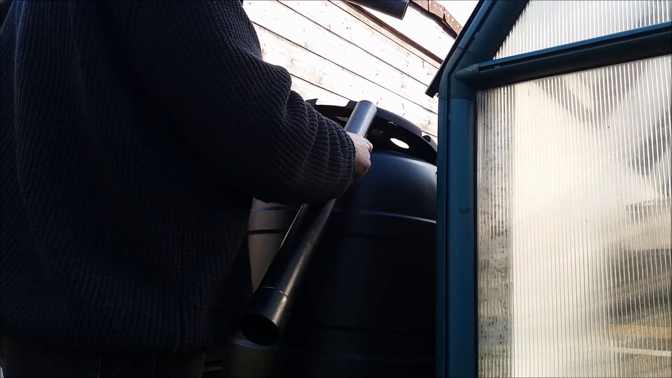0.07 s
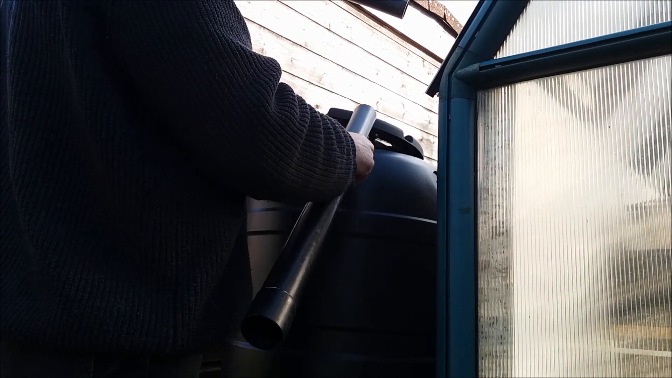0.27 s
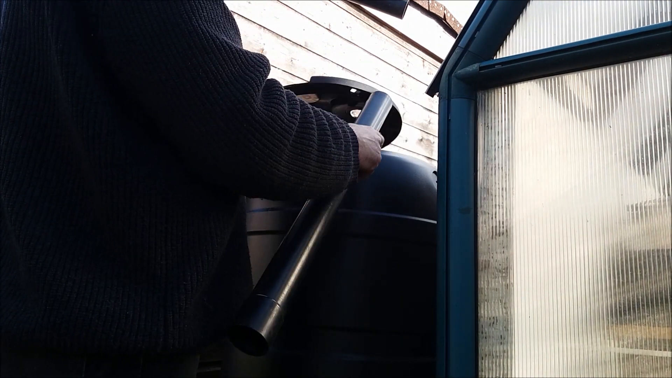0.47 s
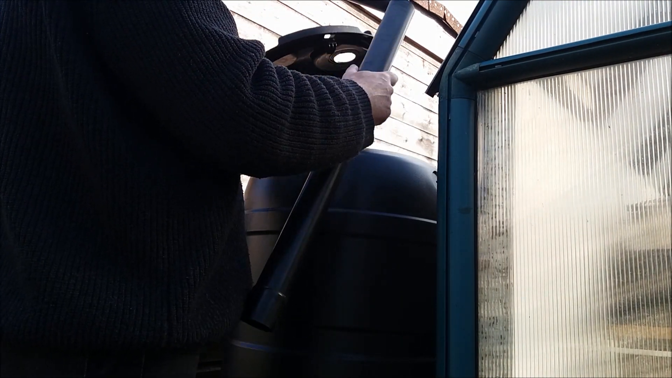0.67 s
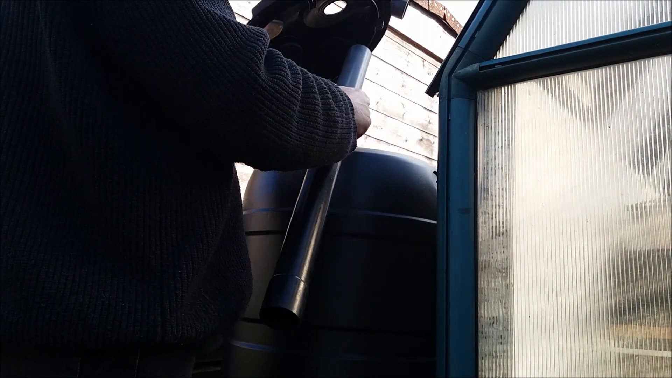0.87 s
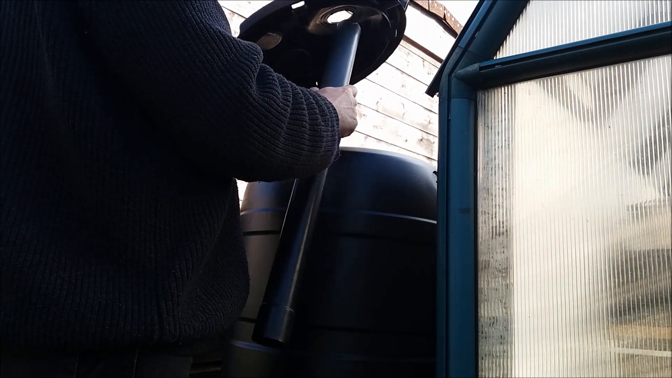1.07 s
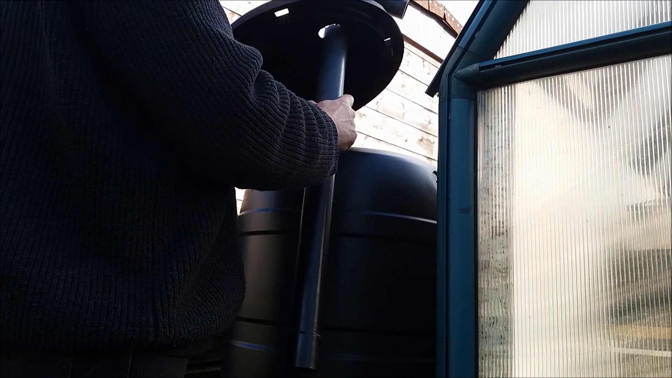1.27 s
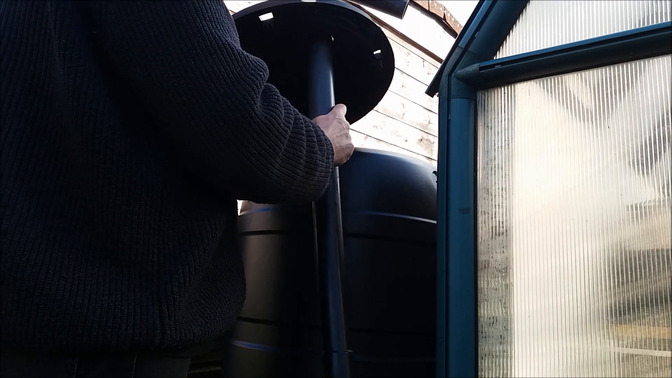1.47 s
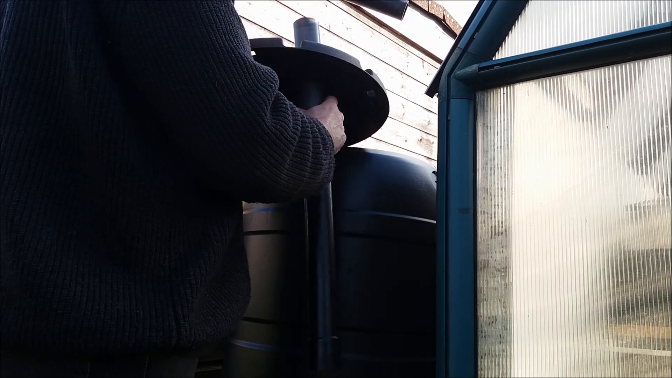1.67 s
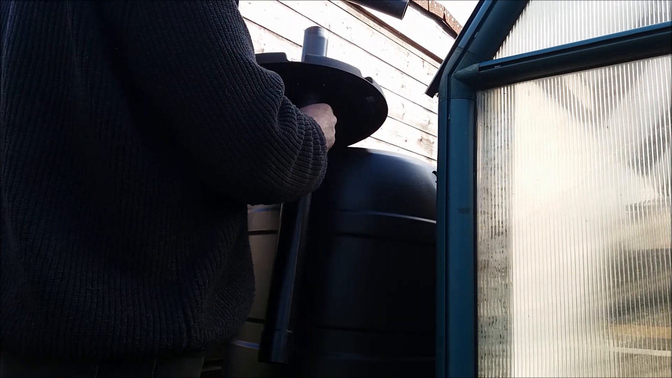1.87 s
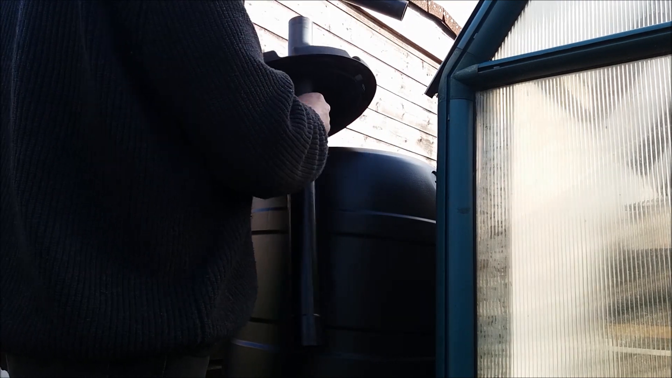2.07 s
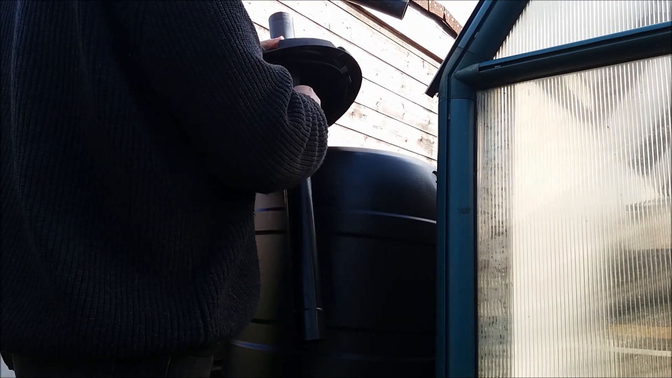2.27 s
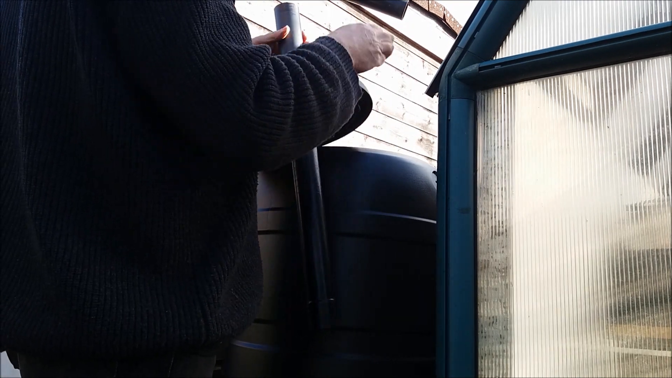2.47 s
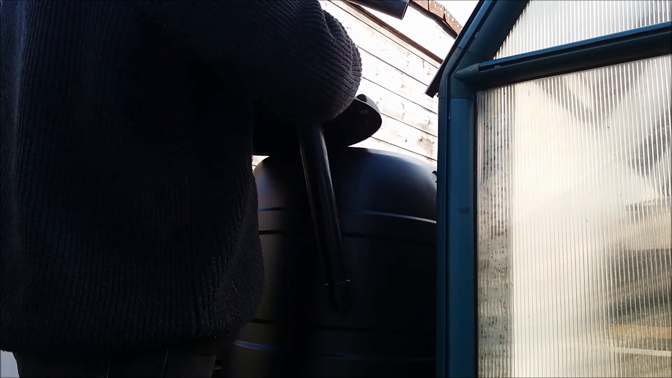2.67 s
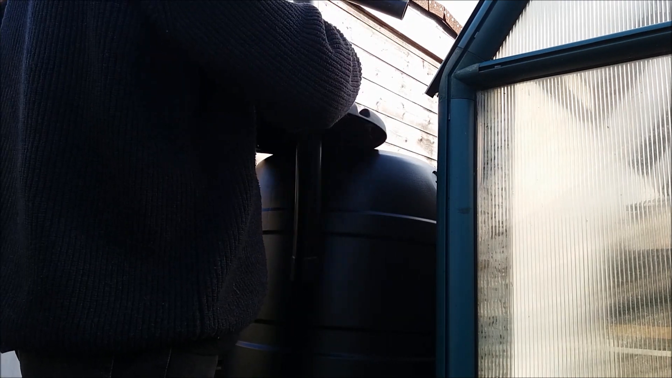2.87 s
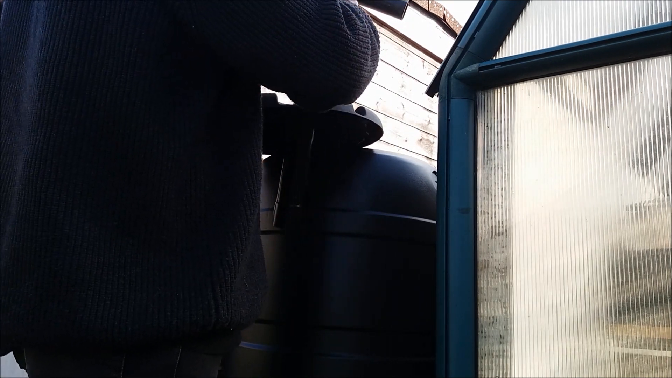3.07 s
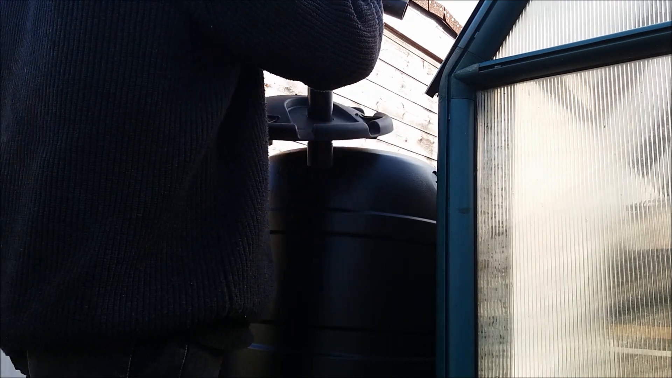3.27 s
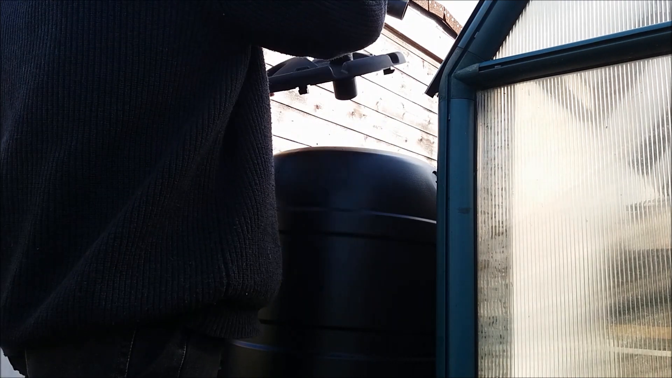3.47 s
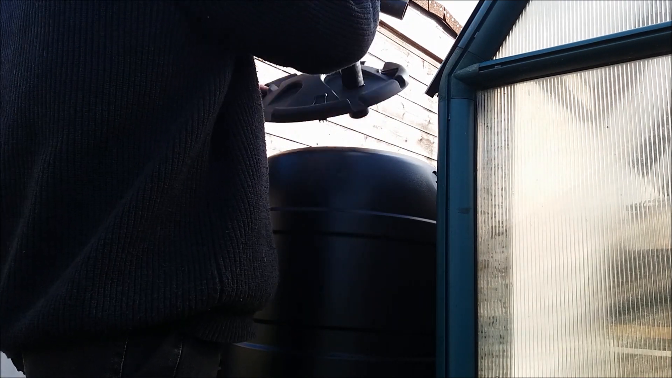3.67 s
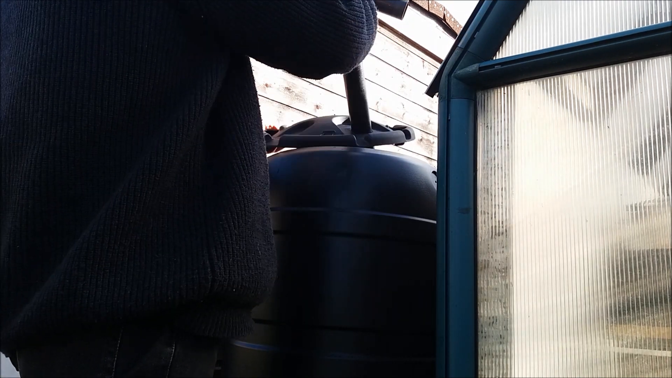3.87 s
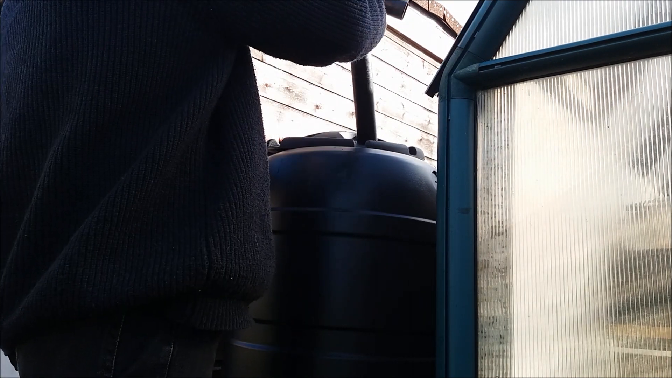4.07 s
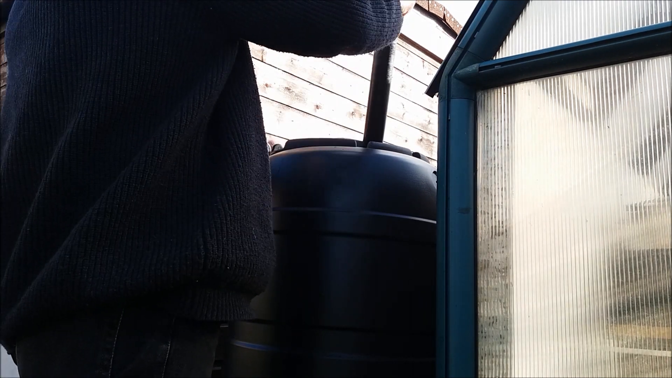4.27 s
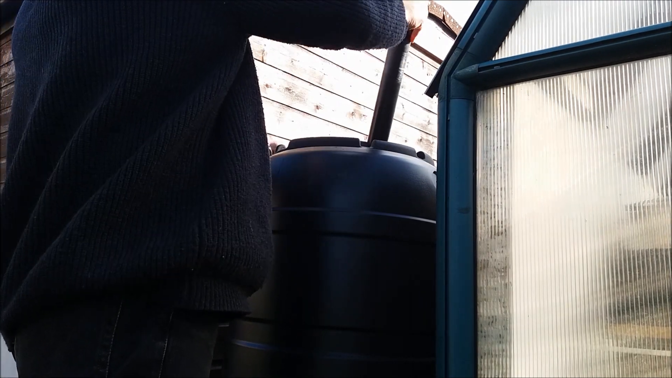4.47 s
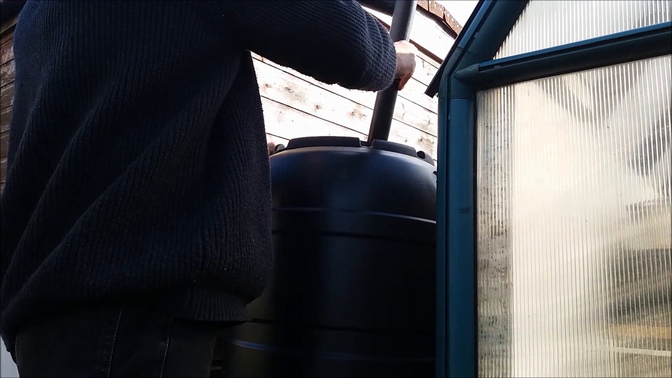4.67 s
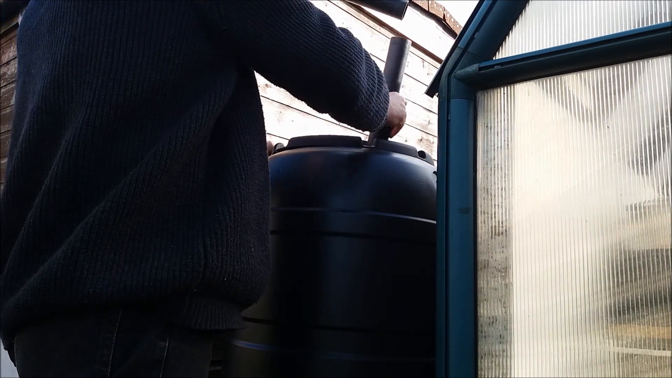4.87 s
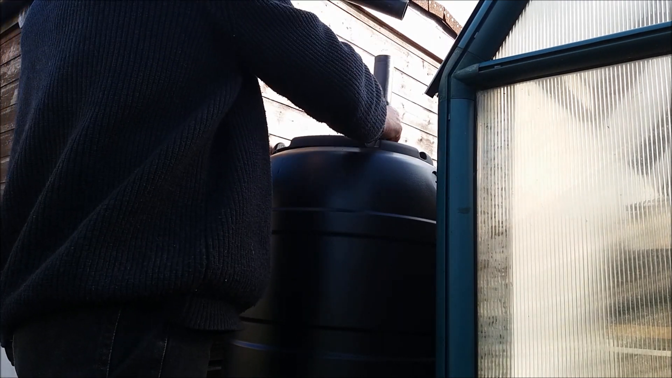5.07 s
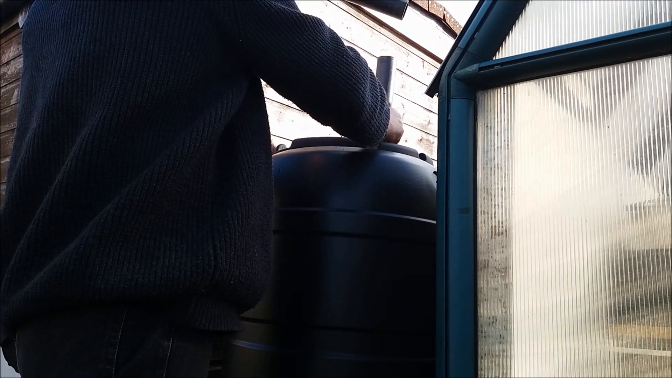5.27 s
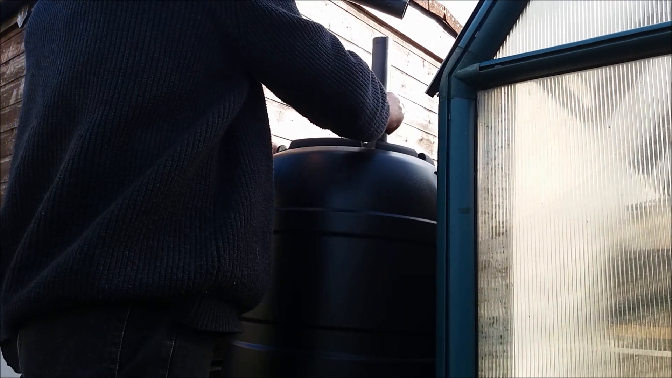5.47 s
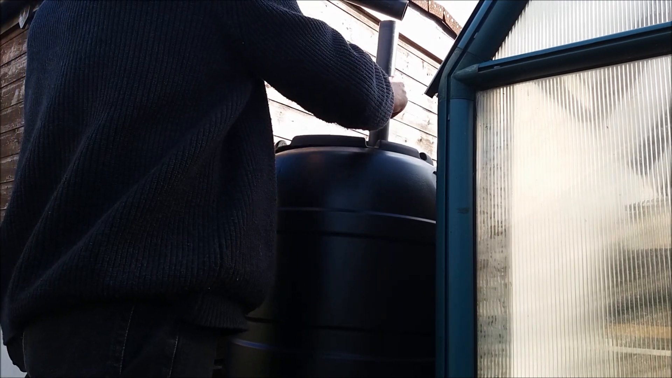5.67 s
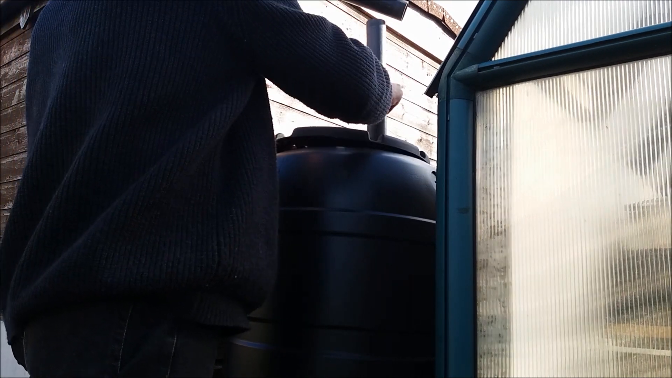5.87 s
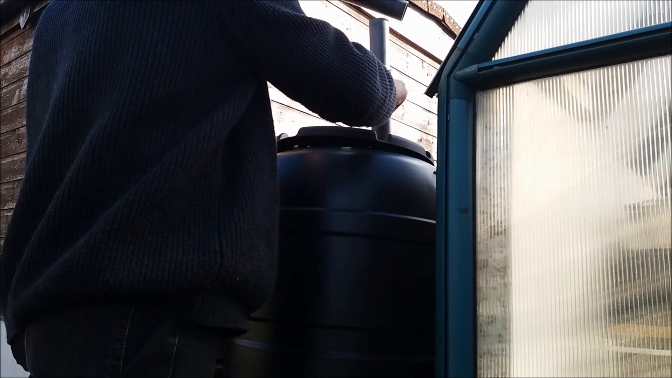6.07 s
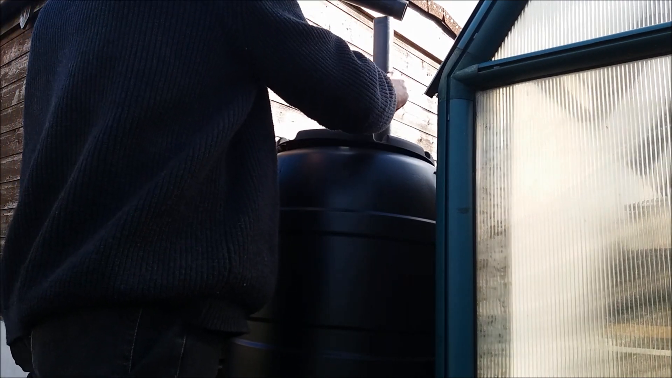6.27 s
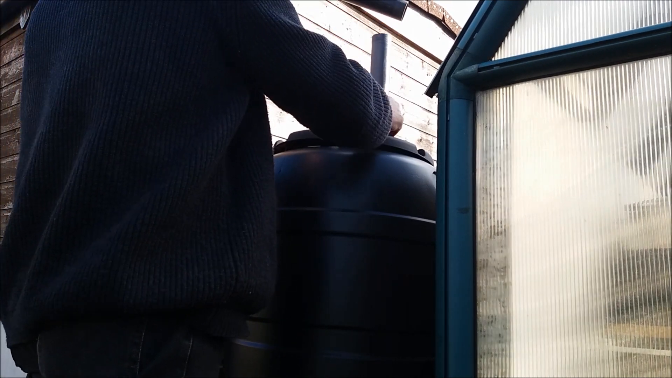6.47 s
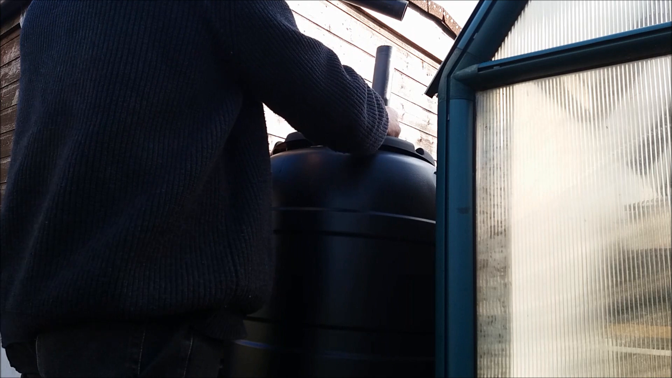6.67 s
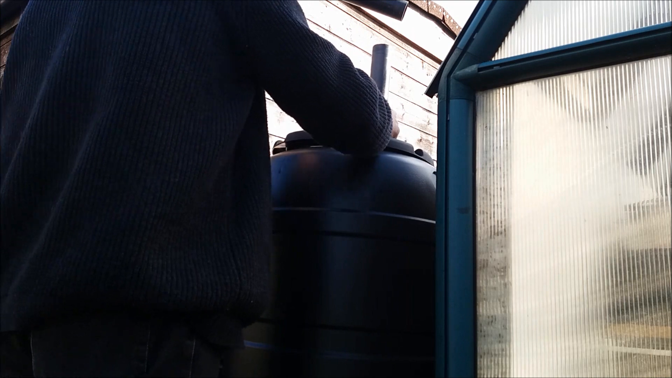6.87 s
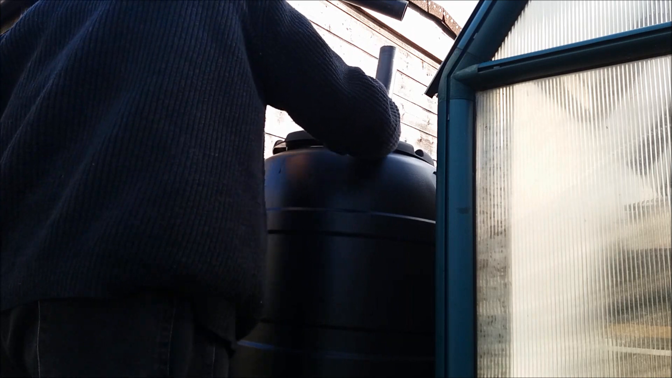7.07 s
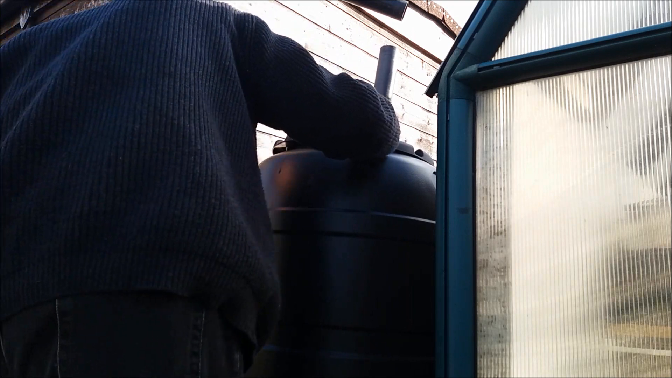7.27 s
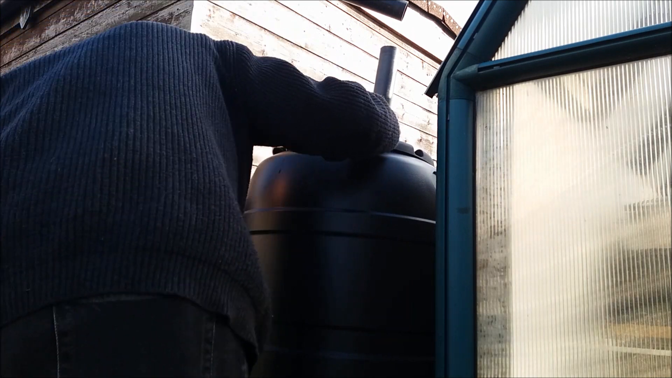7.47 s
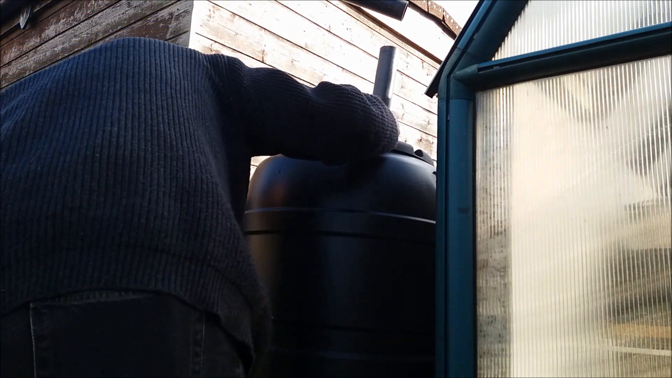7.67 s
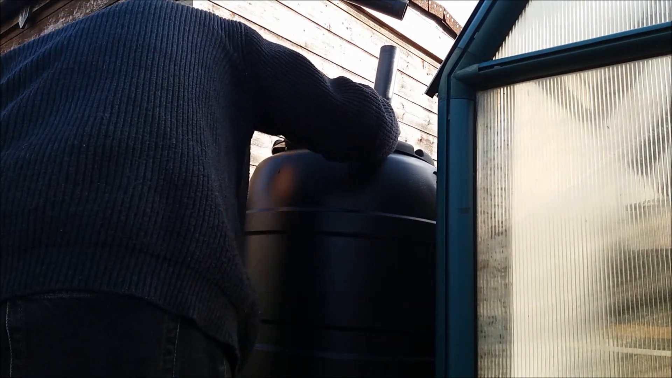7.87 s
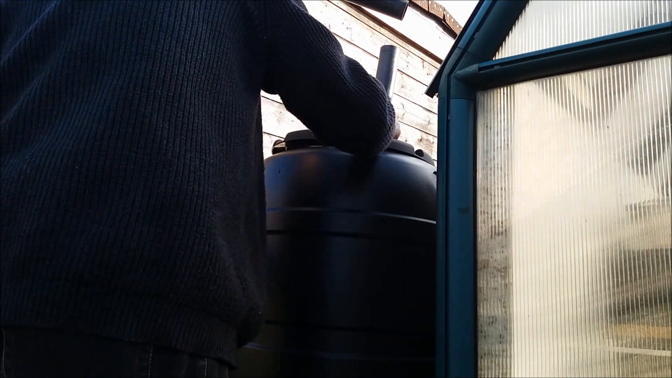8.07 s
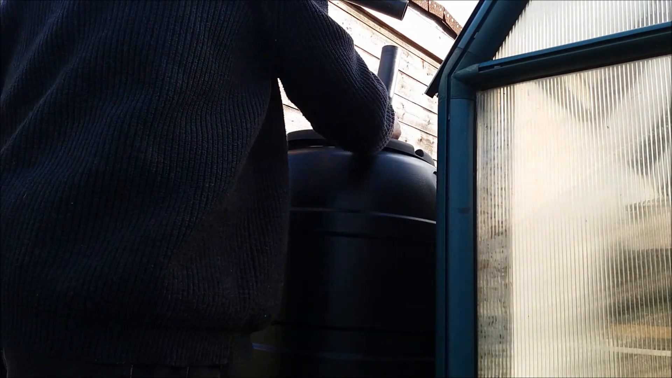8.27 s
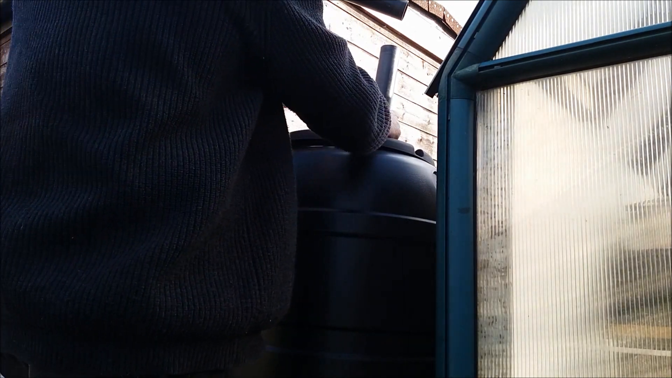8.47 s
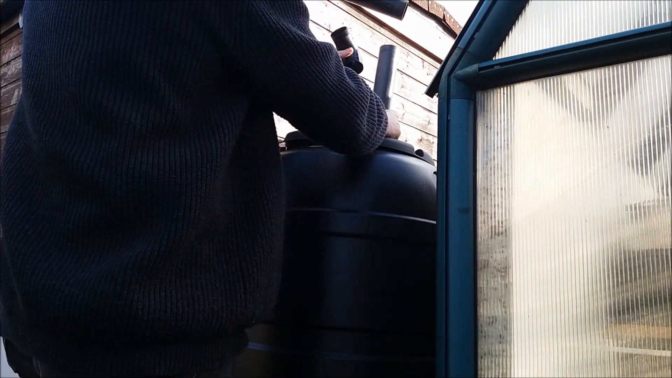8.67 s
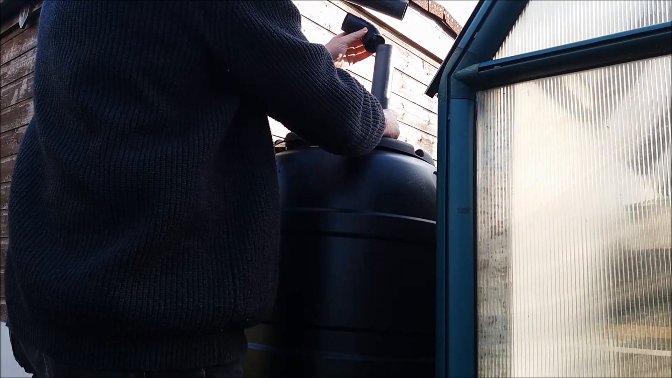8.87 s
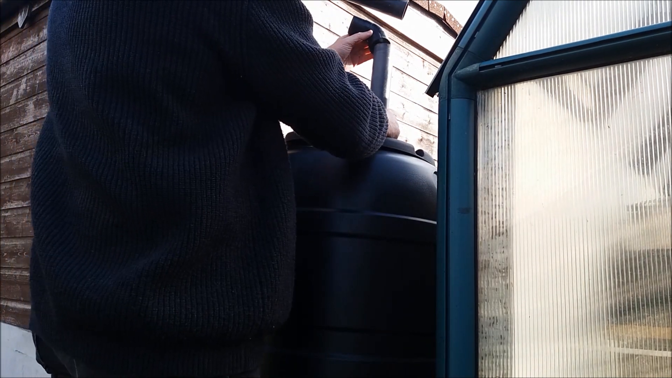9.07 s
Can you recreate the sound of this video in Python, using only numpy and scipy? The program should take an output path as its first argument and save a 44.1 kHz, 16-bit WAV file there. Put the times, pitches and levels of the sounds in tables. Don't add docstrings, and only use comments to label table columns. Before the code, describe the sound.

A close, mostly dry outdoor perspective with slight dull echoes from nearby walls. Far traffic, a low rumble and faint hiss run throughout, the road a little stronger in the first second. At 0.1-0.4 s, faint deep bumps sound inside an empty plastic barrel. From 1.3 s a plastic pipe clicks and knocks, strongest near 1.8 s, then rubs faintly until 2.8 s. At 3.07 s it bangs loudly through the lid, with bounces, a deep boom and ringing bumps to 3.3 s. A dull thump lands at 3.95 s, followed by soft brushing. From 4.5 to 6.3 s come uneven hollow bumps and stuttering scrapes. At 6.35 s a rapid, very loud jammed burst booms and clatters, then muffled bumps and rubbing fade by 7.1 s. A clear small tap with faint bounces comes at 7.75 s. Only distant traffic, rumble and hiss remain to about 9 s.

```python
import sys
import numpy as np
from scipy import signal
from scipy.io import wavfile

SR = 44100
rng = np.random.default_rng(int(sys.argv[2]) if len(sys.argv) > 2 else 0)


def dump(signal):
    limited = np.clip(np.atleast_2d(signal).T, -1, 1)
    pcm = np.round(limited * 32767).astype(np.int16)
    wavfile.write(sys.argv[1], SR, pcm)


def boost_factor(decibels):
    exponent = np.asarray(decibels, float) / 20
    return 10 ** exponent


N = 402191
T = np.arange(N) / SR

# start_s, peak_db, boom_db, hardness_db, ring_time (1 = full)
PIPE_KNOCKS = [(1.2995, -32, -45, -6, 0.4), (1.3065, -25.5, -30, -11, 0.23), (1.652, -30, -38, -6, 0.14),
               (1.7125, -41, -34, -4, 0.65), (1.8052, -16, -21, -16, 0.51),
               (1.8955, -25.5, -10, -16.5, 0.59), (2.004, -44, -4, -8, 0.45), (2.68, -39.5, -21, -4.5, 0.3),
               (2.692, -28, -11, -9.5, 0.15), (2.721, -36.5, -21.5, -2.5, 0.24),
               (2.836, -29.5, -9, -7.5, 0.08)]
LID_KNOCKS = [
    (3.026, -32, -12.5, -9, 0.062),
    (3.0683, -6, -7.5, -10.5, 0.66),
    (3.1155, -17.5, -18, -8.5, 0.55),
    (3.209, -24, 5, -23, 0.18),
    (3.274, -18.5, -14, -16.5, 0.18),
    (3.3095, -15, -8.5, -8, 0.73),
    (3.466, -33, -15, -7.5, 0.34),
    (3.615, -44, -22, -3.5, 0.45),
]
SEAT_KNOCKS = [
    (3.9545, -22, -3.5, -6, 1),
]
INNER_KNOCKS = [(.142, -40, -28, -9, 0.74), (.268, -34, -11, -11, 0.7), (.3, -32, 6, -10.5, .4),
                (.383, -38.5, -8, -14, 0.9), (4.485, -23.5, -29, -9, 0.52), (4.498, -28.5, -19, -5.5, 0.69),
                (4.603, -31, -25, -9.5, 1), (4.639, -24.5, -14.5, -17, 0.51), (4.837, -33, -24, -7.5, 1),
                (4.916, -26.5, -38, -11.5, 0.66), (5.049, -33, -19, -5.5, 0.81),
                (5.267, -21.5, -31, -22.5, 1), (5.599, -37, -21, -3.5, 1), (5.76, -35, -20, -6, 0.77),
                (5.953, -27.5, -17.5, -8.5, 0.26), (6.187, -21, -17, -16.5, 0.36),
                (6.259, -26, -18.5, -24, 0.56), (6.494, -24.5, -19, -35, 0.51), (6.555, -30.5, -24, -8, 1),
                (6.636, -15.5, -12, -41, 0.32), (6.786, -30, -22, -12, 0.76),
                (6.879, -26, -20.5, -14, 0.83), (6.922, -26, -26.5, -6.5, 0.74)]
JAM_KNOCKS = [
    (6.341, -21.5, -5, -9, 0.45),
    (6.348, -12.5, -7, -18, 0.81),
    (6.356, -11.5, -14, -13.5, 1),
    (6.365, -3, -11, -18.5, 0.28),
    (6.3715, -8, 2.5, -14.5, 0.62),
    (6.385, -16.5, 0, -7.5, 0.81),
    (6.419, -23.5, -11, -3, 0.83),
]
FITTING_KNOCKS = [
    (7.7465, -23.5, -11, -10, 0.89),
    (7.774, -38.5, -9, -7.5, 0.92),
    (7.819, -34, 1, -16, 0.82),
]

# pitch_hz, level_db, t60_s (time to fall 60 dB)
PIPE_MODES = [(102, 7, 1), (154.5, 16, 0.092), (201, 2.5, 0.17), (280, 3.5, 0.48), (570, 3, 0.057),
              (720, -3, 0.2), (774, 10.5, 0.053), (1328, 7, 0.12), (1880, 17, 0.026), (2320, -25, 0.1)]
LID_MODES = [(87.4, 5, 1), (101, 6, 0.5), (142, 7, 0.17), (267, -2, 0.37), (317.8, -2.5, 0.47),
             (587, 12, 0.034), (740, 6, 0.075), (964, -42, .1), (1610, 4, 0.073), (1700, 3.5, 0.051),
             (1840, -8.5, 0.2), (2200, -17.5, 0.13), (2370, 7, 0.049)]
SEAT_MODES = [(72.6, 9, 0.11), (84.2, -2, 0.68), (89.5, 0, 0.18), (101.3, -5.5, 0.66), (180, 5.5, 0.053),
              (251, 6.5, 0.042), (296, -10.5, 0.29), (429, -3, 0.044), (770, -1.5, 0.07),
              (938, -13.5, 0.24), (1350, -15, 0.08)]
INNER_MODES = [(55.6, -5, 0.96), (99, 31, 0.075), (168.3, -0.5, 0.18), (277, 8, 0.046), (320, 3.5, 0.062),
               (381, 5.5, 0.041), (487.6, -1.5, 0.094), (716, -6, 0.24), (946, -9, 0.11),
               (1217, -4.5, 0.12), (2210, -5.5, 0.04)]
JAM_MODES = [(59, 5, 0.16), (101, 1, 0.12), (182.3, 0.5, 0.28), (278, 1, 0.17), (324, 2, 0.14),
             (560, 5.5, 0.046), (2250, -16, 0.036)]
FITTING_MODES = [(111, -2, 0.23), (164, 6.5, 0.16), (267, -8, 0.33), (463, 5, 0.04), (810, 6, 0.02),
                 (1394, 1.5, 0.11), (1867, 3.5, 0.07), (2190, -5, 0.059)]

# pitch_hz, level_db (per Hz)
RATTLE = [(150, -3.5), (400, 8), (900, 1.5), (2000, -1.5), (3500, -6.5), (5500, -19.5), (11000, -25.5),
          (15000, -26.5)]
# pitch_hz, t60_s
RATTLE_T60 = [(150, 0.46), (500, 0.12), (1500, 0.22), (4000, 0.21), (10000, 0.09)]
# low_hz, high_hz, level_db
CRACK = [(1000, 2990, 0.5), (3050, 4180, -6.5)]
# start_s, pitch_hz, peak_db, t60_s
TOUCHES = [(1.301, 2700, -39.5, 0.02), (1.308, 4800, -46, 0.028), (1.307, 1350, -31.5, 0.023),
           (1.308, 925, -30, 0.021), (1.716, 690, -26, 0.046), (1.716, 2300, -39, .04),
           (1.787, 3910, -42.5, .03), (2.001, 2005, -46, 0.067), (2.785, 810, -42, 0.055),
           (2.382, 2200, -51.5, 0.12), (2.403, 3600, -58, 0.04), (2.523, 3950, -61, 0.065),
           (2.721, 1770, -37, 0.047), (2.722, 4250, -41.5, .03), (2.839, 2770, -46, .04),
           (3.024, 309, -32, 0.17), (3.025, 740, -38, 0.1), (3.028, 2410, -35, 0.027),
           (3.208, 1420, -34, 0.035), (3.209, 508, -29, 0.046), (3.276, 1170, -27, 0.03),
           (3.468, 2350, -36, 0.031), (3.616, 2280, -44, 0.037), (4.499, 639, -32.5, .15),
           (4.5, 2810, -40, 0.036), (4.623, 1050, -29, 0.022), (4.839, 1800, -39, 0.048),
           (1.898, 1800, -31, 0.013), (3.977, 798, -25, 0.096), (4.988, 2350, -53, .12),
           (5.288, 666, -46, 0.054), (5.565, 2500, -52, 0.044), (5.606, 1240, -38, .04),
           (5.643, 2420, -46, 0.084), (5.756, 2970, -46, .04), (5.955, 3780, -56, 0.027),
           (6.364, 1220, -30, 0.036), (6.375, 3320, -24, 0.024), (6.422, 1270, -36, 0.2),
           (6.42, 1800, -27.5, 0.036), (6.425, 607, -29, 0.13), (6.498, 476, -23, 0.042),
           (6.622, 295, -28.5, 0.2), (6.88, 784, -38.5, 0.11), (6.924, 770, -35.5, 0.064),
           (6.922, 1194, -49, .08), (7.744, 440, -34, 0.023), (7.748, 780, -33, 0.02),
           (7.76, 486, -43, 0.068), (7.772, 1500, -47, 0.045)]
# start_s, level_db, treble_db
SNAPS = [(1.3085, -9, -5), (1.656, -20, 8), (1.787, -21, 15), (1.8083, -12, -4), (1.836, -15, 3),
         (1.896, -22, 5), (1.92, -27, 14), (2.405, -28, 9), (3.0698, 0.5, -18), (3.131, -6, -8),
         (3.2092, -23, -8), (3.276, -17, -6), (3.195, -21, 4), (3.226, -23, -4), (4.8412, -30, 15),
         (4.893, -33, 8), (4.918, -11, 13), (5.014, -27, 0), (5.0517, -22, 10), (5.268, -42, 2),
         (6.375, -5.5, 10), (6.432, -19, -6), (6.46, -24, -4), (4.503, -22, -4), (4.625, -27, 0),
         (6.9224, -24, -2), (7.748, -13.5, 8), (7.7665, -35, 22)]
# delay_s, level_db
ECHOES = [(.0043, -23), (.0091, -16.5), (.0157, -21), (.027, -16.5), (.043, -16)]

# start_s, length_s, level_db, boom_share_db, clatter_share_db
DRAGS = [(.13, 0.12, -49.5, 11.5, -13), (.265, 0.16, -39, 1, -16), (1.645, 0.096, -46.5, -14, 4),
         (1.85, 0.22, -45, -3.5, -3), (2.2, 0.11, -47.5, -4, -0.5), (2.32, 0.17, -53, 2, 5.5),
         (2.41, 0.018, -48, 15, 10), (2.52, 0.19, -54, -4, -0.5), (2.68, 0.56, -52.5, -1.5, 0.5),
         (3.02, 0.024, -32, -7, -9), (3.12, 0.16, -36, -8, -1), (3.36, 0.1, -50, 8, 1),
         (3.48, 0.24, -64, 12, 10), (4.44, 0.07, -48.5, -1, 3.5), (4.485, 0.22, -38.5, -4, -3.5),
         (4.92, 0.39, -45.5, -2, -6), (5.19, 0.18, -43.5, 1.5, -1.5), (5.4, 0.15, -41, -6.5, -3.5),
         (5.63, 0.25, -43.5, -0.5, 0), (5.935, 0.15, -46, 1, -1), (6.19, 0.41, -47.5, 6, -8),
         (6.42, 0.26, -38, -4, -5.5), (6.58, 0.096, -34.5, 1, -5), (6.68, 0.11, -36.5, 2.5, -6),
         (6.88, 0.06, -42.5, -4, 3), (7.05, 0.05, -52.5, 11, 4.5)]
# start_s, length_s, level_db, scratch_share_db, upper_wall_share_db
SCUFFS = [(.06, 0.38, -66.5, -30, 3), (4.595, 0.032, -44, -36, -12), (1.62, 0.026, -40.5, -20, 3),
          (1.675, .035, -44, -12, 0), (1.7, 0.039, -46, -9, 8.5), (1.783, 0.024, -37.5, -10.5, 6),
          (1.86, 0.26, -59.5, -9.5, 3), (2.28, 0.15, -61, -28, -28), (2.47, 0.84, -62.5, -14, 5),
          (2.68, 0.044, -48, -16, 8.5), (2.82, 0.0082, -37, -17, 6.5), (3.022, 0.014, -40.5, -10, 16.5),
          (3.13, 0.098, -45, -18.5, 0.5), (3.36, 0.098, -52, -13, 4.5), (3.428, 0.024, -40, -15, 8.5),
          (3.57, 0.061, -53.5, -14, 8.5), (3.99, 0.27, -63, -30, -2), (4.485, 0.065, -48, -37, -1),
          (4.56, 0.34, -57.5, -30, -0.5), (4.85, 0.08, -50, -14, 3.5), (4.92, 0.11, -59, -9, 10.5),
          (1.33, 0.04, -59, -20, 2), (5.57, 0.18, -52.5, -28, -3), (5.74, 0.17, -60.5, -17, -1),
          (5.95, 0.068, -61, -39, 2), (6.2, 0.58, -59, -30, -9), (6.42, 0.12, -45.5, -31, -8),
          (6.54, 0.11, -46, -22, -6), (6.7, 0.13, -51.5, -26, -2.5), (6.92, 0.1, -57.5, -17, 1),
          (7.0, 0.16, -67.5, -22, 0), (1.49, 0.024, -71, -23, 10), (2.95, .06, -58, -15, 4),
          (3.26, 0.017, -51, -8, 10), (5.045, 0.049, -54, -17, 5), (1.9, 0.025, -63, -5, -2)]
# pitch_hz, width_hz, level_db
BOOM = [(68, 27, 9.5), (80.8, 14, 3.5), (105, 58, -10)]
HOLLOW = [(183, 9.2, -0.5), (278.4, 29.4, 4), (326.3, 8.2, 6), (381, 25, -4), (525, 45, -3.5),
          (591, 50, -6), (773, 54, -4)]
WALL = [(1006, 490, -5), (1440, 270, -4.5), (1473, 76, -8), (1800, 320, -5), (2133, 630, -4.5),
        (2830, 2650, -8.5), (4750, 2500, -8)]
SCRATCH = [(4800, 3700, -1.5), (7960, 2100, 3), (11000, 7000, -8)]
# start_s, end_s, start_hz, end_hz, level_db
SINGING = [(1.652, 1.72, 288, 280, -49.5), (1.738, 1.805, 280, 282, -44.5), (2.78, 2.815, 810, 800, -63),
           (2.828, 2.862, 840, 770, -53.5), (4.542, 4.578, 280, 296, -46), (0.35, 0.455, 320, 280, -54),
           (4.93, 4.97, 280, 267, -50.5), (6.885, 6.925, 380, 370, -48), (7.775, 7.85, 181, 136.5, -51),
           (7.85, 7.93, 137, 128, -67), (3.215, 3.27, 151, 141, -51)]
# start_s, end_s, start_hz, end_hz, level_db
BRUSHES = [
    (.58, .9, 4550, 4300, -90),
    (4.02, 4.22, 1350, 1157, -60.5),
    (4.1, 4.3, 4250, 4450, -81),
    (4.22, 4.5, 4500, 4000, -74.5),
    (4.52, 4.8, 4300, 4600, -78),
    (5.58, 5.76, 2450, 2490, -73),
    (5.78, 5.93, 3250, 3250, -62),
    (5.96, 6.08, 3250, 3150, -66),
    (6.72, 6.83, 2700, 2295, -64),
]

# time_s, level_db
TRAFFIC = [
    (0.0, -52.5),
    (0.46, -52),
    (2.23, -59),
    (3.2, -56.5),
    (3.8, -59),
    (6.5, -57),
    (7.19, -61),
    (8.48, -62.5),
    (9.12, -57.5),
]
# pitch_hz, level_db (per Hz)
ROAD = [(120, -53.5), (200, -16.5), (316, -15.5), (640, -6.5), (892, -2.5), (1870, -14.5), (2420, -34),
        (6500, -68)]
# pitch_hz, width_hz, level_db
TYRES = [(486, 48, 0.5), (856, 130, 2), (1222, 184, -1)]
# time_s, level_db
PASSING = [
    (0, -9),
    (.3, 2),
    (.65, 2.5),
    (1.25, 0),
    (1.45, -5),
    (8.4, -3.5),
    (9.12, -3),
]
# pitch_hz, level_db (per Hz)
RUMBLE = [(15, -54.5), (32, 1.5), (81, -1.5), (219, -7.5), (299, -12.5), (400, -13.5), (520, -17.5),
          (880, -120)]
# pitch_hz, level_db (per Hz)
HISS = [(1470, -22), (2500, 13), (3900, 9.5), (4340, 5), (6970, 6), (8940, 10.5), (15200, 8.5), (16000, 11)]
# time_s, level_db
HISS_SWELL = [
    (0.0, -69),
    (2.64, -70),
    (3.4, -64.5),
    (3.68, -69.5),
    (6.81, -66.5),
    (7.26, -70),
    (9.12, -72),
]

EDGES = 22 * 2 ** np.arange(0, 9.7, 1 / 3)
RATTLE_HZ = np.sqrt(EDGES[9:-2] * EDGES[10:-1])
RATTLE_BANDS = [signal.butter(3, edges, "band", fs=SR, output="sos") for edges in zip(EDGES[9:-2], EDGES[10:-1])]


def rms_one(x):
    return x / np.sqrt(np.mean(x ** 2) + 1e-20)


def in_time(rows):
    s, db = np.transpose(rows)
    return np.interp(T, s, db)


def at_hz(points, hz):
    points_hz, db = np.transpose(points)
    return np.interp(np.log(hz), np.log(points_hz), db)


def low(x, hz):
    return signal.sosfilt(signal.butter(7, hz, fs=SR, output="sos"), x)


def band(x, low_hz, high_hz, order=2):
    return signal.sosfilt(signal.butter(order, [low_hz, high_hz], "band", fs=SR, output="sos"), x)


def drift(rate_hz, depth_db):
    r = np.exp(-80 * np.pi * rate_hz / SR)
    slow = signal.lfilter([1], [1, -2 * r, r * r], rng.standard_normal(N // 40 + 2002))
    slow = slow[2000:]
    return np.interp(np.arange(N) / 40, np.arange(len(slow)), boost_factor(depth_db * rms_one(slow)))


def resonate(x, peaks):
    out = 0
    for k, (hz, width_hz, db) in enumerate(peaks):
        r = np.exp(-np.pi * width_hz / SR)
        b = np.array([1, 0, -1]) * (1 - r * r) / 2
        a = [1, -2 * r * np.cos(2 * np.pi * hz / SR), r * r]
        out = out + (-1) ** k * boost_factor(db) * signal.lfilter(b, a, x)
    return rms_one(out)


def coloured(spectrum, patchy_db):
    white = rng.standard_normal((2, N))
    out = 0
    for k, (low_hz, high_hz) in enumerate(zip(EDGES, EDGES[1:])):
        hz = np.sqrt(low_hz * high_hz)
        if spectrum[0][0] / 1.3 < hz < spectrum[-1][0] * 1.3:
            flicker = drift(2.7, patchy_db) if patchy_db else 1
            out = out + boost_factor(at_hz(spectrum, hz)) * flicker * band(white[k % 2], low_hz, high_hz)
    return rms_one(out)


def glide(table, waver, fade_s):
    out = np.zeros(N)
    for start_s, end_s, start_hz, end_hz, db in table:
        at, t = round(start_s * SR), T[:round((end_s - start_s) * SR)]
        fade = np.minimum(np.minimum(t, t[::-1]) / fade_s, 1)
        hz = np.linspace(start_hz, end_hz, len(t))
        tone = np.sin(2 * np.pi * np.cumsum(hz) / SR)
        out[at:at + len(t)] += boost_factor(db) * fade * waver(at, len(t), start_hz) * tone
    return out


def share_db(hz, peak_db, boom_db, wall_db, crack_db):
    curve = [(130, boom_db), (170, 0), (700, 0), (1200, wall_db + 6), (1700, wall_db + 6), (4000, crack_db + 10)]
    return peak_db + at_hz(curve, hz)


def crack(pulse_db, top_db, size):
    pulse = np.zeros(size) + 1e-18
    pulse[0] = boost_factor(pulse_db)
    bands = CRACK + [(4800, 11000, top_db - 23)]
    return sum(boost_factor(db) * band(pulse, low_hz, high_hz, order=4) for low_hz, high_hz, db in bands)


def clear_ring(blow, lasting, modes, ring_db, soft_hz):
    t = np.arange(SR // 2) / SR
    hz, db, t60_s = np.transpose(modes)[:, :, None]
    strength = boost_factor(share_db(hz, *blow) + db + ring_db + rng.normal(0, 1.5, hz.shape))
    swell = 1 - np.exp(-t * hz * 1.57)
    decay = np.exp(-np.log(1000) * t / (t60_s * lasting))
    detuned = hz * (1 + 0.0063 * rng.standard_normal(hz.shape))
    rings = strength * swell * decay * np.sin(2 * np.pi * detuned * t)
    return signal.sosfilt(signal.butter(4, soft_hz, fs=SR, output="sos"), rings.sum(axis=0))


def wall_rattle(blow, lasting, rattle_db, top_db):
    t = np.arange(SR // 4) / SR
    noise = rng.standard_normal(len(t)) * (1 - np.exp(-t / 0.00035)) * (1 + 0.24 * np.exp(-t / 0.0029))
    out = 0
    for mid_hz, third_octave in zip(RATTLE_HZ, RATTLE_BANDS):
        dying = np.exp(-np.log(1000) * t / (at_hz(RATTLE_T60, mid_hz) * lasting))
        db = share_db(mid_hz, *blow) + at_hz(RATTLE, mid_hz) + rattle_db
        db += top_db * (mid_hz > 5500)
        out = out + boost_factor(db) * signal.sosfilt(third_octave, noise * dying)
    return out


def knocks(table, modes, ring_db, rattle_db, soft_hz, pulse_db, top_db, crack_db):
    out = np.zeros(N + SR)
    contact = crack(pulse_db, top_db, size=2000)
    for start_s, peak_db, boom_db, hard_db, lasting in table:
        hit_db = 2.03 * hard_db + crack_db
        blow = peak_db, boom_db, hard_db, hit_db
        sound = clear_ring(blow, lasting, modes, ring_db, soft_hz)
        sound[:len(contact)] += boost_factor(peak_db + hit_db) * contact
        rattle = wall_rattle(blow, lasting, rattle_db, top_db)
        sound[:len(rattle)] += rattle
        at = round((start_s + .0015) * SR)
        out[at:at + len(sound)] += sound
    return out[:N]


def all_knocks():
    return (knocks(PIPE_KNOCKS, PIPE_MODES, -13.5, rattle_db=0.5, soft_hz=3250, pulse_db=22.5, top_db=1, crack_db=2.5)
            + knocks(LID_KNOCKS, LID_MODES, -12.5, rattle_db=-1.5, soft_hz=2700, pulse_db=35.5, top_db=-17, crack_db=1.5)
            + knocks(SEAT_KNOCKS, SEAT_MODES, 1.3, rattle_db=2, soft_hz=1500, pulse_db=38.5, top_db=-3, crack_db=-20)
            + knocks(INNER_KNOCKS, INNER_MODES, -12, rattle_db=-4, soft_hz=2580, pulse_db=26.5, top_db=-9, crack_db=0)
            + knocks(JAM_KNOCKS, JAM_MODES, -11, rattle_db=-6.5, soft_hz=3930, pulse_db=23, top_db=-4.5, crack_db=-3)
            + knocks(FITTING_KNOCKS, FITTING_MODES, -14, rattle_db=-5.5, soft_hz=3570, pulse_db=25.5, top_db=3,
                     crack_db=9.5))


def touches():
    out, t = np.zeros(N), T[:SR // 5]
    for start_s, hz, db, t60_s in TOUCHES:
        apart = rng.uniform(1.04, 1.09)
        pair = np.sin(2 * np.pi * hz * t) + 0.5 * np.sin(2 * np.pi * hz * apart * t)
        rise = 1 - np.exp(-t * hz / 1.2)
        at = round(start_s * SR)
        out[at:at + len(t)] += boost_factor(db - 60 * t / t60_s) * rise * pair
    return out


def snaps():
    out = np.zeros(N)
    for start_s, db, top_db in SNAPS:
        at = round(start_s * SR)
        out[at:at + 1000] += crack(db, top_db - 7, size=1000)
    return out


def garden(x):
    out = x.copy()
    for delay_s, db in ECHOES:
        lag = round(delay_s * SR)
        out[lag:] += boost_factor(db) * signal.lfilter([.4], [1, -.6], x[:-lag])
    return out


def grains(per_s, spread_db):
    sizes = boost_factor(spread_db * np.minimum(rng.exponential(1, N), 5)) * rng.choice([-1, 1], N)
    return rms_one(sizes * (rng.random(N) < per_s / SR) + 1e-9)


def strokes(table, attack_s, sag_db, release_s):
    power = np.zeros((3, N))
    for start_s, length_s, db, *shares_db in table:
        at = round(start_s * SR)
        t = T[:SR // 2][:N - at]
        shape = boost_factor(db - sag_db * t / length_s) * np.minimum(t / attack_s, 1)
        shape = shape * np.exp(-np.maximum(t - length_s, 0) / release_s)
        power[:, at:at + len(t)] += (shape * boost_factor(np.array([0, *shares_db]))[:, None]) ** 2
    return np.sqrt(power)


def rubbing():
    quick, slow = grains(2600, 1.8), grains(1000, 2.8)
    boom = resonate(resonate(grains(300, 1.0), BOOM), [(71.6, 230, 0)])
    hollow_top_hz, wall_top_hz = 1600, 4800
    hollow = low(resonate(slow, HOLLOW[:4]), hollow_top_hz)
    clatter = boost_factor(-3.5) * drift(14, depth_db=1.3) * low(resonate(slow, HOLLOW[4:]), hollow_top_hz)
    walls = []
    for k, (hz, width_hz, db) in enumerate(WALL):
        grip = drift(12, depth_db=1.3)
        walls.append((-1) ** k * boost_factor(db) * grip * resonate(quick, [(hz, width_hz, db)]))
    lower = rms_one(low(sum(walls[:5]), wall_top_hz / 1.44))
    upper = boost_factor(-10) * rms_one(low(sum(walls[5:]), wall_top_hz))
    scratch = resonate(.5 * quick + grains(6800, 1.5), SCRATCH)

    drag, drag_boom, drag_clatter = strokes(DRAGS, attack_s=0.015, sag_db=8.5, release_s=0.045)
    scuff, scuff_scratch, scuff_upper = strokes(SCUFFS, attack_s=.03, sag_db=2.5, release_s=.032)
    drags = drag_boom * boom + drag * hollow + drag_clatter * (clatter + boost_factor(-16) * (lower + upper))
    scuffs = scuff * lower + scuff_upper * upper + scuff_scratch * scratch
    judder = boost_factor(-2) * drift(25, depth_db=0.5)
    return judder * (drags + scuffs)


def singing():
    strength = boost_factor(9) * drift(30, depth_db=2)
    return glide(SINGING, lambda at, size, hz: strength[at:at + size], fade_s=0.0082)


def brushing():
    def ruffle(at, size, hz):
        slow = signal.butter(2, 0.06 * hz, fs=SR, output="sos")
        return 1.4 * rms_one(signal.sosfilt(slow, rng.standard_normal(size)))
    return glide(BRUSHES, ruffle, fade_s=0.063)


def road():
    ridges = resonate(resonate(rng.standard_normal(N), TYRES), TYRES)
    roar = coloured(ROAD, patchy_db=2) + boost_factor(in_time(PASSING)) * ridges
    return boost_factor(in_time(TRAFFIC) - 3.5) * roar


def rumble():
    return boost_factor(-59) * coloured(RUMBLE, patchy_db=None)


def hiss():
    return boost_factor(in_time(HISS_SWELL) - 0.5) * coloured(HISS, patchy_db=None)


def scene():
    contacts = garden(all_knocks() + touches() + snaps())
    sliding = rubbing() + singing() + brushing()
    return (contacts + sliding + road() + rumble() + hiss())[None]


def band_limit(x):
    return signal.sosfilt(signal.butter(12, 16300, fs=SR, output="sos"), x)


def record(dry):
    x = signal.sosfilt(signal.butter(5, 52, "high", fs=SR, output="sos"), dry)
    x = signal.sosfilt(signal.cheby2(12, 60, 16200, fs=SR, output="sos"), x)
    return band_limit(x)


dry = scene()
out = record(dry)
dump(out)
```